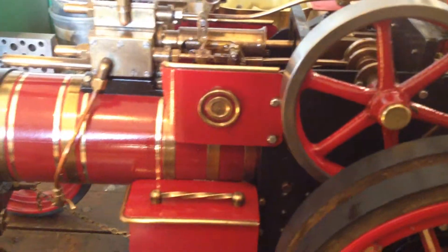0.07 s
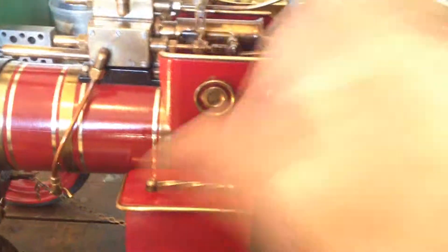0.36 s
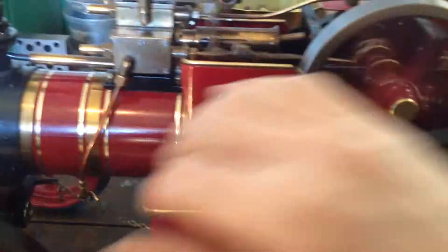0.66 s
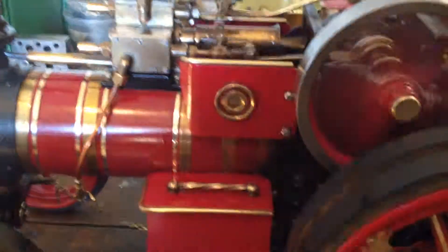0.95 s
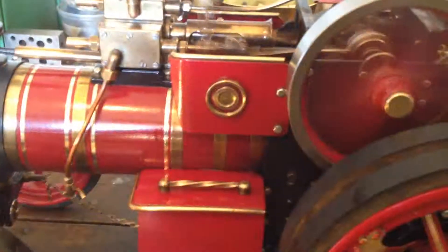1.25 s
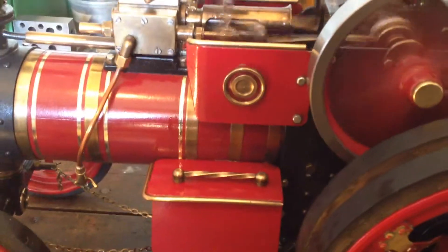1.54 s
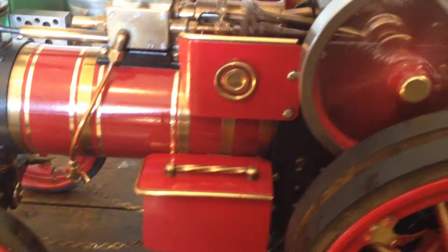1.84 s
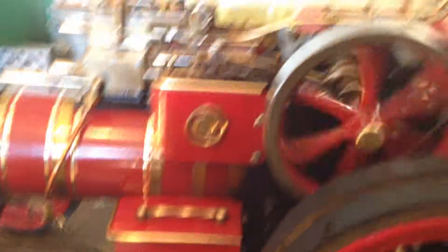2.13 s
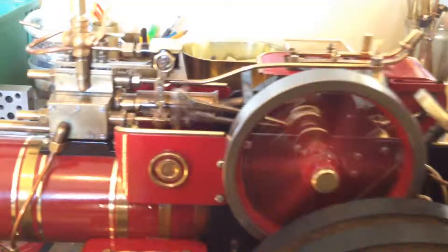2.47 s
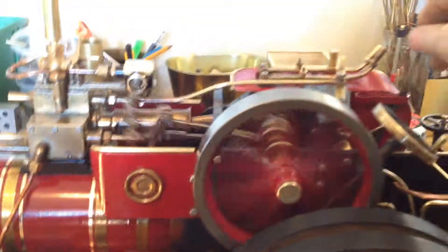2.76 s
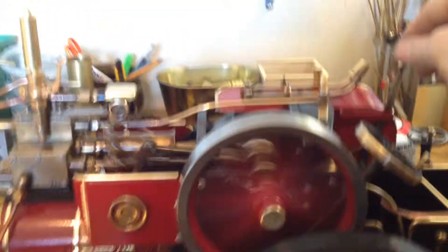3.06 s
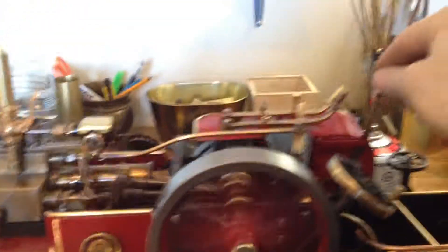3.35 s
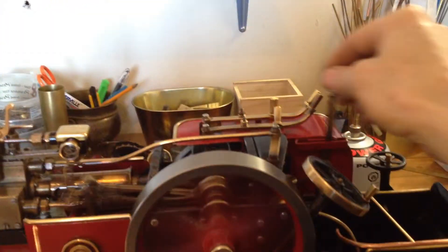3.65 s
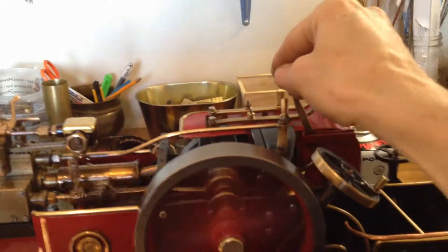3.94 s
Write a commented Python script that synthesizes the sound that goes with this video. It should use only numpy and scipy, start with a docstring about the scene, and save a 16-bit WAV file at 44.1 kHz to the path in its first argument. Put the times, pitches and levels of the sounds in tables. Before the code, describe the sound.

A small model steam engine simmers close by in a small room, with faint burner hiss, gurgles and sizzling drops. At about 0.5 seconds it starts chuffing quickly, each puff ringing hollowly, with wet spits and squeaks. Around 2 seconds it nearly stalls and gurgles. From 2.3 seconds it picks up with louder chuffs, racing with brighter hiss and more spits from 3 seconds, easing slightly near 4.

```python
"""A model steam traction engine simmers indoors, starts up, races, nearly stalls and picks up again.
Each exhaust stroke puffs steam up the chimney, which rings like a pipe; water spits and squeaks out
with many strokes. In between, steam keeps blowing and gurgling, the burner hisses and drops sizzle
on hot metal. Moving air rumbles briefly, and a small workshop adds a short echo."""
import sys
import numpy as np
from scipy import signal
from scipy.fft import rfft, irfft, next_fast_len
from scipy.io import wavfile
from scipy.ndimage import uniform_filter1d, map_coordinates

SR = 44100
rng = np.random.default_rng(int(sys.argv[2]) if len(sys.argv) > 2 else 0)


def inscribe(sig):
    """Save sig as 16-bit PCM at rate SR to the path in sys.argv[1].

    A 1-D sig is mono; a 2-D sig holds one channel per row.
    Samples are clipped to [-1, 1] before scaling.
    """
    pcm = np.round(np.clip(np.atleast_2d(sig).T, -1, 1) * 32767)
    wavfile.write(sys.argv[1], SR, pcm.astype(np.int16))


N = 176400

# Levels in the tables are relative: the functions add their own gains.
# steam that blows between strokes: t/s, chimney level/dB, hiss level/dB, low body level/dB
BLOW = [(0.0, -49, -46.5, -58), (0.2, -52, -49, -59), (0.43, -42, -45, -64), (0.51, -23.5, -27.5, -36),
        (0.59, -29, -33, -41.5), (0.65, -28.5, -31, -39.5), (1.06, -29.5, -28, -34),
        (1.41, -26.5, -22.5, -31), (1.53, -26, -25, -31), (1.73, -34, -31, -35), (1.94, -32, -48, -38),
        (2.04, -32, -50, -47), (2.27, -24.5, -34, -39.5), (2.43, -29.5, -31.5, -41),
        (2.54, -28.5, -28.5, -33.5), (2.64, -25.5, -34, -37), (3.13, -26.5, -31.5, -32.5),
        (3.64, -32, -27, -29), (3.84, -26.5, -28.5, -33.5), (4.0, -42, -36, -32)]
# exhaust strokes: t/s, chimney level/dB, low body level/dB, hiss level/dB
STROKES = [(0.4725, -15, -18.5, -26), (0.592, -20, -23, -29.5), (0.6614, -12, -21, -26.5),
           (0.7485, -12, -21.5, -27.5), (0.7985, -15, -22, -28.5), (0.871, -31, -22.5, -27),
           (0.9154, -34, -29, -26.5), (0.9797, -32, -21.5, -29), (1.02, -34, -26, -28.5),
           (1.0793, -25, -19, -26.5), (1.114, -37, -23, -28), (1.167, -28, -26, -29),
           (1.2034, -18, -20, -29), (1.254, -11, -20, -26), (1.2864, -28, -25, -37),
           (1.3344, -19, -27, -34), (1.3644, -22, -25, -32), (1.4127, -27, -23, -32),
           (1.4451, -24, -36, -36), (1.491, -35, -23, -28), (1.5184, -18, -22, -25.5),
           (1.563, -16, -23, -26), (1.5903, -22, -24, -27), (1.6274, -22, -20, -26.5),
           (1.6474, -22, -23, -33), (1.7177, -17, -18.5, -31), (1.7454, -16.5, -22, -29),
           (1.8043, -38, -23.5, -31), (1.855, -22, -26, -29), (1.9273, -18, -24.5, -30),
           (2.029, -24, -24.5, -29.5), (2.206, -19, -25, -29), (2.2654, -31, -22, -31),
           (2.2782, -7, -19, -21.5), (2.4472, -4.5, -20.5, -22.5), (2.56, -5, -16, -20.5),
           (2.649, -10, -21, -21), (2.73, -9.5, -20, -20.5), (2.798, -10.5, -18, -21),
           (2.8653, -16, -22, -19.5), (2.9323, -10, -17.5, -18.5), (2.989, -13.5, -20.5, -21),
           (3.046, -27, -22.5, -19.5), (3.103, -11, -20.5, -17.5), (3.1562, -10, -22.5, -20.5),
           (3.207, -5, -20.5, -19), (3.2546, -12, -19, -18.5), (3.2984, -15, -29, -21.5),
           (3.348, -10, -22, -19.5), (3.3924, -8.5, -23, -20.5), (3.4404, -8.5, -35, -20.5),
           (3.484, -11.5, -25, -21), (3.528, -8.5, -28.5, -18.5), (3.5645, -14, -37, -23.5),
           (3.613, -10, -37, -21), (3.649, -11, -21, -19.5), (3.691, -14.5, -23, -21),
           (3.732, -35, -20.5, -17), (3.7723, -14, -20.5, -23), (3.8074, -16, -19.5, -22),
           (3.837, -14, -26, -39), (3.9054, -33, -26.5, -26), (3.9404, -38, -21.5, -27),
           (3.9934, -15, -27, -29)]
# the jet, the bright edge of the hiss: t/s, level against the plain hiss/dB
JET_SHARE = [(0, -5), (2.0, -4), (2.6, -4.5), (2.95, -0.5), (3.75, 0.5), (4, -2.5)]
# middle pitch of the chimney's lowest note, higher with drier steam: t/s, f/Hz
WHISTLE_PITCH = [(0, 1118), (.9, 1089), (1.6, 1109), (2.1, 1125), (2.6, 1110), (3.3, 1153), (4, 1109)]

# Modes are the notes a pipe likes to ring at: f/Hz, width/Hz, level/dB
SECOND_MODES = [(2100, 340, -4), (2284, 81, 6.5)]  # the chimney blown hard
THIRD_MODE = [(3640, 69, 0)]  # its next note up
HIGH_MODES = [(3650, 100, -4.5), (4400, 90, -5.5), (5180, 88, -3.5), (6290, 120, 0.5)]  # its highest notes
HOLLOW_MODES = [(646, 83, -5), (835, 77, 0)]  # notes that grow as the jet hardens
GURGLE_MODES = [(305, 150, -3.5), (1065, 128, 4.5), (2170, 57, 0.5), (3730, 120, -12.5)]  # notes that bubbles set ringing

# Tone colours say how strong each frequency is: f/Hz, level/dB
BODY_COLOUR = [(30, -44), (70, -31), (120, -8.5), (175, -7.5), (220, -4), (360, 3.5), (460, -1.5),
               (660, -2), (830, 2), (950, 1), (1350, -2), (1700, -3), (2900, -5), (4000, -9.5), (8000, -39)]  # the low rush of steam
HISS_COLOUR = [(500, -59), (2000, -1), (3000, 4.5), (3450, -2), (4000, -5), (4700, 1), (5800, 3.5),
               (6700, 4), (7600, -3.5), (9500, 0), (11500, -6), (13000, -3.5), (15200, -4)]  # the nozzle's hiss
JET_COLOUR = [(3000, -61), (4800, -15.5), (5800, -14.5), (6700, -1), (7500, 10.5), (8400, 5.5),
              (9500, -13.5), (11500, 2), (14000, -37)]  # its bright edge
BURNER_COLOUR = [(30, -47), (150, 5.5), (350, 18.5), (700, -4.5), (1600, -55.5), (3000, -52), (4100, -34),
                 (5900, 12), (6600, -22), (7600, 6), (9000, 0), (11000, -37), (13800, -27), (15200, -3)]  # the burner's hiss
SIZZLE_COLOUR = [(3000, -40), (6000, -6), (7500, 1.5), (9000, -2), (11000, -24), (15000, -24)]  # water on hot metal
WET_COLOUR = [(60, -60), (200, 6), (500, -6.5), (1200, 2.5), (3100, -2), (4200, -37), (9000, -18)]  # pops, thuds and squeaks
SPRAY_COLOUR = [(100, -36), (250, -9), (370, 2.5), (480, -4), (650, -16), (1000, -5), (1400, 3),
                (1750, -0.5), (2500, -16), (3050, 1.5), (3900, -24), (9000, -38)]  # wet spatter
DRAUGHT_COLOUR = [(20, -14), (50, -6), (75, 0), (110, 6), (250, -30)]  # rumbling air

# condensed water gurgling in the chimney: t/s, level/dB
GURGLES = [(0.0134, -32), (0.0587, -29), (0.075, -27.5), (0.1346, -33), (0.19, -31.5), (0.254, -28),
           (0.345, -30.5), (0.407, -29), (0.422, -24), (0.44, -22), (0.503, -21.5), (0.527, -22),
           (0.8985, -16.5), (1.883, -20), (1.9825, -20.5), (2.0296, -18.5), (2.0787, -29), (2.1091, -26),
           (2.1271, -27), (2.1584, -25), (2.186, -26), (2.234, -21), (2.4144, -24.5)]
# larger drops snapping on hot metal: t/s, level/dB
SNAPS = [(0.0258, -32), (0.0948, -32), (0.1094, -39), (0.169, -28), (0.2603, -29), (0.2783, -29),
         (2.138, -24)]
# slugs of water popping in the chimney: t/s, level/dB, final f/Hz
SPITS = [(0.4723, -14.5, 2290), (0.6614, -14.5, 2310), (0.8006, -12, 2360), (0.9173, -8.5, 1620),
         (1.0206, -12, 1370), (1.1159, -10, 1474), (1.2042, -13.5, 2080), (1.2874, -10.5, 1550),
         (1.3673, -8.5, 2220), (1.4446, -7, 1735), (1.5085, -10, 2170), (1.5898, -9.5, 1750),
         (1.6496, -12.5, 2530), (1.717, -12.5, 2410), (1.7564, -12, 2190), (1.8552, -16, 1550),
         (2.4463, -13, 2214), (2.6489, -11.5, 2300), (3.047, -17, 2400), (3.1547, -18, 2160),
         (3.4401, -10, 2230), (3.5648, -16, 2240), (3.8521, -12, 2300)]
# water squeaking as it is squeezed through the steam port: t/s, level/dB
SQUEAKS = [(0.5874, -30), (0.7444, -37), (0.8655, -23), (0.903, -32), (0.9752, -20), (1.0104, -25),
           (1.0739, -21.5), (1.1054, -22), (1.1653, -20), (1.2486, -36), (1.3339, -22), (1.4117, -21),
           (1.4843, -21), (1.5077, -30), (1.5614, -22), (1.624, -17.5), (1.6856, -24), (1.736, -32),
           (1.8008, -29), (1.9275, -37), (3.0434, -15.5), (3.1033, -27), (3.1519, -16), (3.253, -22),
           (3.3468, -17.5), (3.6142, -22), (3.692, -21)]
# a passing breath of air: t/s, level/dB
DRAUGHT = [(.9, -90), (1.03, -57), (1.2, -56), (1.4, -72), (1.6, -90)]
# how long the room's echo lasts: f/Hz, time to fade by 60 dB/s
ROOM_FADE = [(150, 0.23), (2000, 0.26), (12000, 0.3)]

POP_SWELL_S = 0.0016  # a pop takes this long to reach its peak
BASS_HZ, TOP_HZ = 82, 15400


def amp(db):
    """Turn decibels into a number to multiply by."""
    return 10 ** (np.asarray(db) / 20)


def unit(x):
    """Scale x to an average strength (rms) of 1."""
    return x / np.sqrt(np.mean(x ** 2) + 1e-20)


def along(points, hz):
    """Read a table of (frequency, value) at hz, on a log frequency scale."""
    f, values = np.transpose(points)
    return np.interp(np.log(hz + 1), np.log(f + 1), values)


def curves(rows):
    """Join a table's rows with straight lines: one curve for each column after the time."""
    times, *columns = np.transpose(rows)
    return [np.interp(np.arange(N) / SR, times, column) for column in columns]


def wobble(rate):
    """A smooth curve through `rate` random points a second."""
    points = rng.standard_normal(int(N * rate / SR) + 4)
    return map_coordinates(points, [np.arange(N) * rate / SR])


def filtered(x, response):
    """Multiply each frequency in x by response(hz)."""
    size = next_fast_len(N + SR // 2)
    return irfft(rfft(x, size) * response(np.fft.rfftfreq(size, 1 / SR)), size)[:N]


def coloured(x, colour):
    """Give x a tone colour; plain noise keeps its strength."""
    return filtered(x, lambda hz: unit(amp(along(colour, hz))))


def bursts(times, levels_db, rise_s, fall_db_per_s):
    """A loudness curve of bursts that each swell up to their time, then fade."""
    t, power = np.arange(N) / SR, np.zeros(N)
    for s, db, fall in np.broadcast(times, levels_db, fall_db_per_s):
        near = slice(max(int(s * SR) - SR // 10, 0), int(s * SR) + SR // 3)
        age = t[near] - s
        swell = np.exp(np.minimum(age, 0) / rise_s)
        power[near] += (swell * amp(db - fall * np.maximum(age, 0))) ** 2
    return np.sqrt(power)


def steam(sputter_db, rate):
    """Swirling steam: noise that sputters as droplets break the flow."""
    return unit(rng.standard_normal(N) * amp(sputter_db * wobble(rate)))


def whistle():
    """The chimney's lowest note: a hollow tone that wavers and flutters."""
    hz = curves(WHISTLE_PITCH)[0] * (1 + .012 * wobble(rate=35) + .048 * wobble(rate=400))
    return unit(amp(3.75 * wobble(rate=110)) * np.sin(2 * np.pi * np.cumsum(hz) / SR))


def pipe(modes, sputter_db):
    """A breathy tone: steam rings the modes, and its swings in loudness are partly evened out."""
    def response(f):
        peaks = sum((-1) ** k * amp(db) * 1j * f * width / (hz * hz - f * f + 1j * f * width)
                    for k, (hz, width, db) in enumerate(modes))
        return peaks / np.sqrt(np.mean(abs(peaks) ** 2))
    tone = filtered(steam(sputter_db, rate=250), response)
    steadiness, window_s = 0.54, 0.0059  # a steadiness of 1 would hold the level even
    power = abs(uniform_filter1d(tone ** 2, int(window_s * SR))) + 1e-9
    return unit(tone / power ** (steadiness / 2))


def puffs(levels_db, quickness):
    """Loudness of the strokes: the cylinder empties faster when the engine runs faster."""
    times = np.transpose(STROKES)[0]
    gaps_s = np.maximum(np.diff(times), .02)
    gaps_s = np.append(gaps_s, gaps_s[-1])
    stroke_s = 0.097  # at this spacing and a quickness of 1, a puff fades 22 dB by the next one
    fall_db_per_s = quickness * 22 / stroke_s * (stroke_s / gaps_s) ** 0.52
    return bursts(times, levels_db, .0052 / quickness, fall_db_per_s)


def exhaust():
    """Blowing and puffing steam rings the chimney, rushes, hisses at the nozzle and makes the boiler hum."""
    _, ring_db, body_db, hiss_db = np.transpose(STROKES)
    blow_ring_db, blow_hiss_db, blow_body_db = curves(BLOW)
    jet = amp(curves(JET_SHARE)[0])
    plain_share = 1 / np.hypot(1, jet)
    # Loudness curves; hypot adds the power of the puffs and the blowing.
    low = np.hypot(puffs(ring_db * 0 + body_db - 5.5, quickness=2.6), amp(blow_ring_db - 6))
    ring = np.hypot(puffs(ring_db - 12, quickness=1.28), amp(blow_ring_db - 6.5))
    body = np.hypot(puffs(body_db - 6, quickness=1.02), amp(blow_body_db))
    hiss = np.hypot(puffs(hiss_db - 3, quickness=0.85), amp(blow_hiss_db - 7.5)) * plain_share
    chimney = (low * whistle()
               + ring * pipe(SECOND_MODES, sputter_db=5.5)
               + amp(-6) * hiss * pipe(HIGH_MODES, sputter_db=7)
               + amp(-15.5) * np.hypot(low, ring) * plain_share * pipe(THIRD_MODE, sputter_db=1.5)
               + amp(-11) * body * jet * pipe(HOLLOW_MODES, sputter_db=2))
    rush = coloured(body * steam(sputter_db=2.5, rate=300), BODY_COLOUR)
    nozzle = coloured(hiss * steam(sputter_db=1.9, rate=250), HISS_COLOUR)
    edge = coloured(hiss * jet * steam(sputter_db=3.5, rate=400), JET_COLOUR)
    hum_hz, hum_width_hz = 170.4, 5.8
    hum = amp(blow_body_db - 15) * pipe([(hum_hz, hum_width_hz, 0)], sputter_db=0)
    return chimney + rush + nozzle + edge + hum


def burner(ticks_per_s=70, tick_s=0.00083):
    """The burner hisses steadily while tiny drops sizzle on hot metal."""
    drops = (rng.random(N) < ticks_per_s / SR).astype(float)
    fades = signal.lfilter([1], [1, -np.exp(-1 / (tick_s * SR))], drops)
    sizzle = unit(coloured(fades * rng.standard_normal(N), SIZZLE_COLOUR))
    hiss = coloured(steam(sputter_db=2, rate=130), BURNER_COLOUR)
    return amp(-50.5) * hiss + amp(-54) * sizzle


def gurgles():
    """Bubbles in the condensed water burst and ping the chimney's lower notes."""
    times, db = np.transpose(GURGLES)
    tone = amp(-10.5) * pipe(GURGLE_MODES, sputter_db=1) + amp(-6.5) * whistle()
    return bursts(times, db, rise_s=.002, fall_db_per_s=680) * tone


def snaps():
    """Single drops flash into steam on hot metal."""
    times, db = np.transpose(SNAPS)
    loudness = bursts(times, db - 7.5, rise_s=.0002, fall_db_per_s=4000)
    return coloured(loudness * rng.standard_normal(N), SIZZLE_COLOUR)


def chirp(start_hz, end_hz, glide_s, swell_s, rough):
    """A short tone that slides from start_hz towards end_hz; random jitter in pitch makes it rough."""
    t = np.arange(SR // 30) / SR
    hz = end_hz + (start_hz - end_hz) * np.exp(-t / glide_s)
    jitter = unit(uniform_filter1d(rng.standard_normal(len(t)), size=12))
    loudness = t / swell_s * np.exp(1 - t / swell_s)
    return loudness * np.sin(2 * np.pi * np.cumsum(hz * (1 + rough * jitter)) / SR)


def spits():
    """Water leaves with the steam, as hard pops with a hollow thud or as squeaks."""
    out = np.zeros(N + SR)
    for s, db, end_hz in SPITS:
        pop = chirp(start_hz=3120, end_hz=end_hz, glide_s=.0012, swell_s=POP_SWELL_S, rough=0.378)
        thud = chirp(start_hz=372.4, end_hz=372.4, glide_s=.0066, swell_s=.0066, rough=0.37)
        out[round(s * SR):][:len(pop)] += amp(db) * (amp(-4.5) * pop + amp(-18) * thud)
    for s, db in SQUEAKS:
        squeak = chirp(start_hz=3160, end_hz=1763, glide_s=.00777, swell_s=.0034, rough=0.14)
        out[round(s * SR):][:len(squeak)] += amp(db - 0.5) * squeak
    return filtered(out[:N], lambda hz: amp(along(WET_COLOUR, hz)))


def spray():
    """Each pop starts with a bright crack; pops and squeaks scatter into wet spatter."""
    pop_s, pop_db, _ = np.transpose(SPITS)
    squeak_s, squeak_db = np.transpose(SQUEAKS)
    fronts = bursts(pop_s + POP_SWELL_S / 2, pop_db - 17.5, rise_s=.00049, fall_db_per_s=1000)
    after_pops = bursts(pop_s + POP_SWELL_S, pop_db - 20, rise_s=.002, fall_db_per_s=450)
    after_squeaks = bursts(squeak_s + .0054, squeak_db - 15.5, rise_s=.002, fall_db_per_s=450)
    crack = fronts * steam(sputter_db=4, rate=900)
    spatter = np.hypot(after_pops, after_squeaks) * steam(sputter_db=2.5, rate=400)
    return coloured(crack, HISS_COLOUR) + coloured(spatter, SPRAY_COLOUR)


def draught():
    """Moving air brushes the microphone with a soft rumble."""
    return amp(curves(DRAUGHT)[0]) * coloured(rng.standard_normal(N), DRAUGHT_COLOUR)


def room(x):
    """The small workshop's echo comes 5 ms late; its high notes last slightly longer."""
    hz, t, noise = signal.stft(rng.standard_normal(SR // 2), SR, nperseg=256)
    fade = amp(-60 * t / along(ROOM_FADE, hz)[:, None])
    tail = signal.istft(noise * fade, SR, nperseg=256)[1]
    return signal.fftconvolve(np.pad(x, (SR // 200, 0)), tail / np.linalg.norm(tail))[:N]


def scene():
    """The engine close by, in its room; so small a source gives off no deep bass."""
    engine = exhaust() + burner() + gurgles() + snaps() + spits() + spray()
    engine = filtered(engine, lambda hz: (1j * hz / (BASS_HZ + 1j * hz)) ** 2)
    return (engine + amp(-9) * room(engine) + draught())[None]


def record(dry):
    """Cut away everything above TOP_HZ."""
    return np.array([filtered(x, lambda hz: hz < TOP_HZ) for x in dry])


dry = scene()
out = record(dry)
inscribe(out)
```